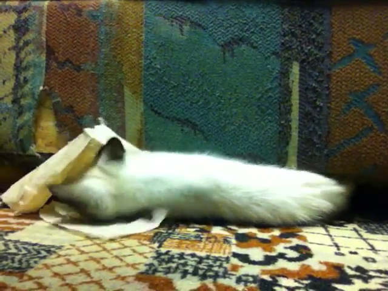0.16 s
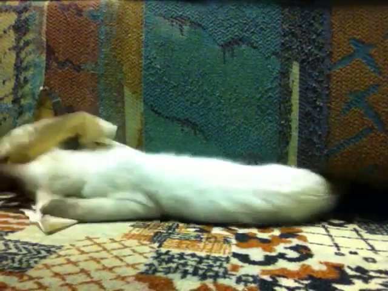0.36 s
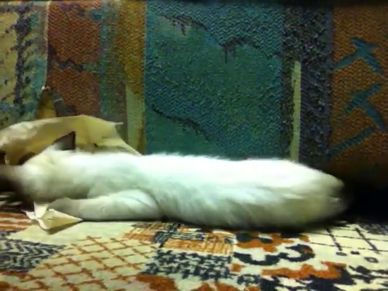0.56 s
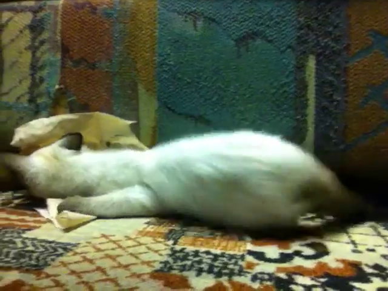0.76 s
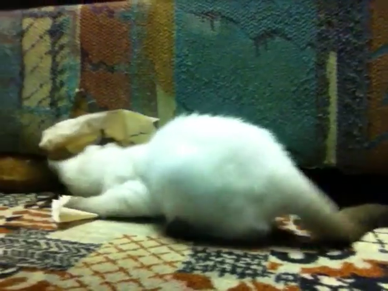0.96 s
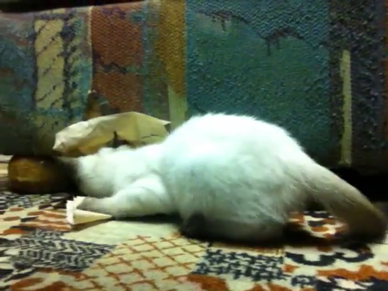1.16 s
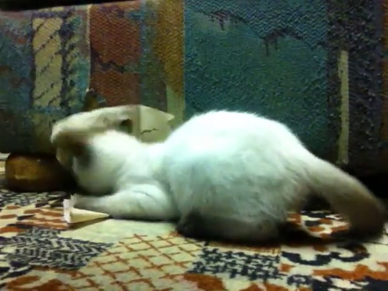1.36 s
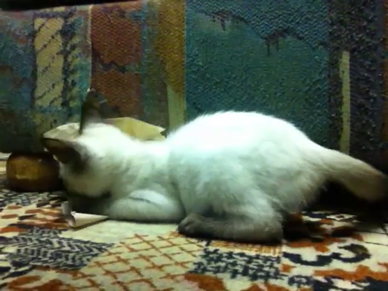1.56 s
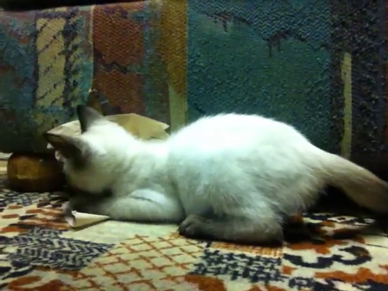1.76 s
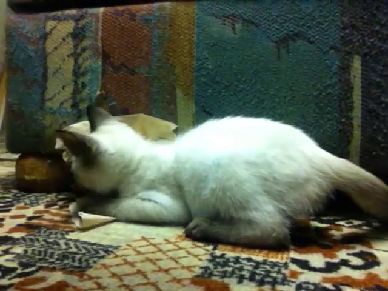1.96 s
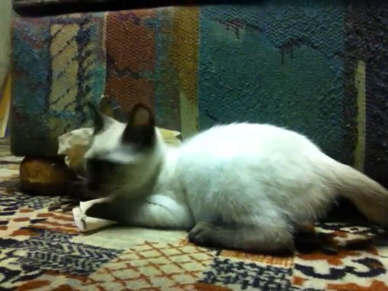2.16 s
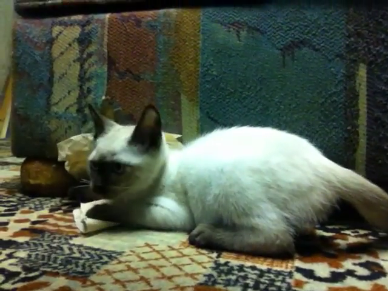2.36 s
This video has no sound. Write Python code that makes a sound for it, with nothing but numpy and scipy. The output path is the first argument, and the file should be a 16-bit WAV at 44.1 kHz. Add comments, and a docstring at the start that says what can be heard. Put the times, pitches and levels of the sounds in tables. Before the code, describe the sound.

Crumpled paper rustles and crackles in short bursts as a kitten paws it on carpet.

```python
"""A kitten paws at crumpled paper on a carpet, over quiet room tone and microphone hiss.
0.1-0.7 s: the hardest tug; fibres slip and rustle, creases snap, panels flap, paws thump the floor.
0.9-1.2 s: fur slides over the pile, with lighter rustling and more soft paw falls.
1.4-1.8 s: claws scratch the sheet in runs of ticks, among weaker snaps and flaps.
2.1-2.3 s: a last snap and a few scratches, then the rustle fades."""
import sys
import numpy as np
from scipy import signal
from scipy.fft import rfft, irfft
from scipy.io import wavfile

SR = 44100
rng = np.random.default_rng(int(sys.argv[2]) if len(sys.argv) > 2 else 0)


def inscribe(sig):
    """Save sig as 16-bit PCM at rate SR to the path in sys.argv[1].

    A 1-D sig is mono; a 2-D sig holds one channel per row.
    Samples are clipped to [-1, 1] before scaling.
    """
    pcm = np.round(np.clip(np.atleast_2d(sig).T, -1, 1) * 32767)
    wavfile.write(sys.argv[1], SR, pcm.astype(np.int16))


N = 105840
TIME = np.arange(N) / SR


def amp(db):
    """Decibels to gain."""
    return 10 ** (np.asarray(db) / 20)


def unit(x):
    """Scale to rms 1."""
    return x / np.sqrt(np.mean(x ** 2) + 1e-20)


def read(points, hz):
    """Interpolate a table on a log-frequency axis."""
    points_hz, value = np.transpose(points)
    return np.interp(np.log(hz + 1), np.log(points_hz + 1), value)


def add(mix, start_s, sound):
    """Mix a sound in at start_s."""
    part = mix[max(round(start_s * SR), 0):][:len(sound)]
    part += sound[:len(part)]


def colour(x, spectrum, size=4096):
    """Causal unit-energy filter with the given spectrum."""
    log_gain = np.log(amp(read(spectrum, abs(np.fft.fftfreq(size, 1 / SR)))))
    taps = np.fft.ifft(np.exp(np.conj(signal.hilbert(log_gain)))).real[:size // 2]
    return signal.fftconvolve(x, taps / np.linalg.norm(taps))[:N]


def grains(per_s, spread_db, clump_db, clump_s=0.0045):
    """Tiny slips of uneven size, in clumps; rms 1."""
    size = amp(spread_db * np.minimum(rng.exponential(1, N), 4)) * rng.choice([-1., 1.], N)
    window = np.hanning(int(2 * clump_s * SR) + 3)
    clumps = unit(signal.fftconvolve(rng.standard_normal(N), window, "same"))
    return unit(size * (rng.random(N) < per_s / SR) * amp(clump_db * clumps))


def swing(t, hz, rise_cycles):
    """Heavily damped oscillation whose envelope peaks after rise_cycles; peak 1."""
    age = t * hz / rise_cycles
    wave = np.sin(2 * np.pi * hz * t) * age * np.exp(-age)
    return wave / abs(wave).max()


def background(hiss_db=-56, whine_db=-85, whine_hz=15280):
    """Room tone, microphone hiss and a thin electronic whine."""
    # Noise floor. Each row: frequency in Hz, relative density in dB.
    spectrum = [(20, -1), (50, -14), (85, 3.5), (190, 1), (330, -3), (470, -9), (690, -11.5), (1000, -18.5),
                (1500, -18.5), (2200, -17.5), (3200, -19.5), (5000, -19), (9000, -20.5), (15500, -23.5)]
    gain = amp(read(spectrum, np.fft.rfftfreq(N, 1 / SR)))
    hiss = unit(irfft(rfft(rng.standard_normal(N)) * gain, N))
    return amp(hiss_db) * hiss + amp(whine_db) * np.sin(2 * np.pi * whine_hz * TIME)


def room(x, predelay_s=0.004, tap_chance=0.07):
    """Short tail of a furnished room: sparse reflections, dying fastest near 5 kHz."""
    # Room decay. Each row: frequency in Hz, T60 in seconds.
    t60_by_hz = [(100, .3), (400, 0.22), (1500, 0.31), (5000, 0.16), (12000, 0.36)]
    n = SR // 2
    taps = rng.choice([-1., 1.], n) * (rng.random(n) < tap_chance) * (TIME[:n] > predelay_s)
    hz, t, bands = signal.stft(taps, SR, nperseg=256)
    decay = amp(-60 * t / read(t60_by_hz, hz)[:, None])
    tail = signal.istft(bands * decay, SR, nperseg=256)[1]
    return signal.fftconvolve(x, tail / np.linalg.norm(tail))[:N]


def slides(sheen_hz=5400, sheen_width_hz=520, sheen_db=8.5):
    """Fur and paws on carpet and paper: fine slips swell with each stroke, with a narrow treble sheen."""
    # Each row: fastest moment in seconds, rise in seconds, fall in seconds, level in dB.
    strokes = [(.125, 0.028, .04, -61), (.345, 0.12, 0.092, -53), (.525, 0.036, .03, -56),
               (0.944, 0.075, 0.08, -52.5), (1.54, 0.2, .1, -69)]
    # Fur on the pile. Each row: frequency in Hz, relative density in dB.
    spectrum = [(200, 4), (1000, 8), (2200, 7), (2900, 5.5), (3800, 0.5), (4700, -0.5), (5900, -8),
                (6500, 0), (7500, -3.5), (10000, -8), (15000, -37)]
    speed = np.zeros(N)
    for peak_s, rise_s, fall_s, db in strokes:
        width_s = np.where(TIME < peak_s, rise_s, fall_s)
        speed += amp(db) * np.exp(-((TIME - peak_s) / width_s) ** 2)
    hiss = colour(grains(per_s=20000, spread_db=3.5, clump_db=0.4) * speed, spectrum)
    sheen = signal.lfilter(*signal.iirpeak(sheen_hz, sheen_hz / sheen_width_hz, SR), hiss)
    return hiss + amp(sheen_db) * sheen


def thumps(floor_hz=93, floor_t60_s=0.18, floor_db=-7.5, highpass_hz=73.4):
    """Each paw gives a padded push and the floor booms briefly."""
    # Each row: start in seconds, level in dB, pitch in Hz.
    paw_falls = [(0.413, -30.5, 178), (0.4774, -30.5, 128), (.496, -39, 94.4), (.597, -40.5, 108),
                 (0.678, -45, 102), (0.914, -43.5, 108), (1.054, -40, 117), (1.066, -36.5, 105),
                 (1.172, -54, 152), (1.58, -46.5, 102)]
    out, t = np.zeros(N), TIME[:SR // 3]
    boom = amp(floor_db - 60 * t / floor_t60_s) * np.sin(2 * np.pi * floor_hz * t)
    for start_s, db, hz in paw_falls:
        add(out, start_s, amp(db) * (swing(t, hz, rise_cycles=0.41) + boom))
    return signal.lfilter(*signal.butter(2, highpass_hz, "high", fs=SR), out)


def scratches(release_s=0.014, lowpass_hz=4900):
    """A claw catches in a quick run of ticks that ring the paper, then lets go."""
    # Each row: start in seconds, hold in seconds, level in dB.
    catches = [(1.45, 0.0046, -69), (1.46, .005, -68), (1.584, 0.0033, -54), (1.6567, 0.015, -52),
               (2.1024, 0.011, -44), (2.17, 0.013, -61), (2.253, .006, -59.5)]
    # Paper under a claw. Each row: frequency in Hz, bandwidth in Hz, relative level in dB.
    resonances = [(360, 50, -2), (1050, 230, -6), (1360, 150, 0), (1623, 130, -5), (1984, 93, -8),
                  (2600, 180, -8.5), (4150, 230, -15)]
    force = sum(amp(db) * (TIME >= start_s) * np.exp(-np.maximum(TIME - start_s - hold_s, 0) / release_s)
                for start_s, hold_s, db in catches)
    t = TIME[:SR // 20]
    body = np.zeros(len(t))
    for k, (hz, width_hz, db) in enumerate(resonances):
        envelope = amp(db) * width_hz * np.exp(-np.pi * width_hz * t)
        body += (-1) ** k * envelope * np.cos(2 * np.pi * hz * t)
    body = signal.lfilter(*signal.butter(2, lowpass_hz, "low", fs=SR), body)
    ticks = grains(per_s=2600, spread_db=-0.8, clump_db=3.5)
    return signal.fftconvolve(ticks * force, body / np.linalg.norm(body))[:N]


def sheet(x, gain_db=-14.5):
    """The sheet's modes ring on after whatever shakes it."""
    # Each row: frequency in Hz, relative level in dB, T60 in seconds.
    modes = [(150, -4, .18), (374, 1, .22), (950, -4, .18), (1078, -4, .18), (1292, -8, .18),
             (1390, -7, .14), (1495, -9, .18), (2010, -12, .12), (2750, -14, .1)]
    t = TIME[:SR // 4]
    ringing = sum(amp(db - 60 * t / t60_s) * np.sin(2 * np.pi * hz * t) for hz, db, t60_s in modes)
    return amp(gain_db) * signal.fftconvolve(x, 2 * ringing / np.sum(ringing ** 2))[:N]


def slack_fold(start_s=0.574, level_db=-34.5, start_hz=400, fall_s=0.042, decay_s=0.021):
    """A taut fold sags in pitch as it slackens."""
    out, t = np.zeros(N), TIME[:SR // 8]
    cycles = np.cumsum(start_hz * np.exp(-t / fall_s)) / SR
    add(out, start_s, amp(level_db) * np.sin(2 * np.pi * cycles) * np.exp(-(t / decay_s) ** 2))
    return out


def flaps():
    """Whole panels of the sheet pop over."""
    # Each row: start in seconds, peak in dB, pitch in Hz.
    pops = [(.144, -43.5, 550), (0.229, -47, 254), (0.2445, -35, 255), (0.2805, -32, 384),
            (0.308, -26, 327), (0.3192, -23.5, 340), (0.3319, -33, 360), (0.343, -32.5, 210),
            (0.3493, -36, 253), (0.482, -33, 288), (.518, -37, 355), (0.537, -38, 330), (.556, -33.5, 580),
            (0.921, -40.5, 252), (1.054, -33.5, 269), (1.437, -44, 345), (1.495, -38.5, 394),
            (1.545, -42, 430), (1.591, -45, 484), (1.606, -45, 396)]
    out, t = np.zeros(N), TIME[:SR // 8]
    for start_s, db, hz in pops:
        add(out, start_s, amp(db) * swing(t, hz, rise_cycles=0.4))
    return out


def snaps(grit_gain=0.18, grit_decay_s=0.0057):
    """Creases flip, each with a sharp swing and a little grit."""
    # Each row: start in seconds, level in dB, pitch in Hz.
    creases = [(.109, -39.5, 2870), (.136, -47, 1070), (.18, -45, 1360), (.221, -32.5, 1170),
               (.228, -40, 1370), (.289, -43, 1200), (.3195, -26, 1065), (.33, -36.5, 3000),
               (.436, -35.5, 1580), (.46, -38, 1230), (.47, -32.5, 1340), (.511, -43, 1300),
               (.545, -32, 1140), (.574, -34.5, 1390), (.581, -43, 1400), (.611, -41, 1440),
               (.668, -39.5, 2100), (.923, -38, 1320), (.932, -44, 1500), (1.094, -44, 1090),
               (1.469, -42, 1170), (1.492, -43, 1280), (1.661, -43, 1910), (1.758, -53, 1660),
               (1.543, -39.5, 3300), (1.587, -42, 2700), (1.593, -41, 1400), (2.1088, -40, 3500),
               (2.112, -56, 1380)]
    out, t = np.zeros(N), TIME[:SR // 20]
    for start_s, db, hz in creases:
        band = signal.butter(2, [hz / 2, hz * 2], "band", fs=SR)
        grit = unit(signal.lfilter(*band, rng.standard_normal(len(t)))) * np.exp(-t / grit_decay_s)
        add(out, start_s, amp(db) * (swing(t, hz, rise_cycles=0.42) + grit_gain * grit))
    return out


def rustle():
    """Fibres and small folds slip, sounding through the sheet."""
    # How hard the paper is worked. Each row: time in seconds, level in dB.
    effort_curve = [(0, -75), (.08, -60.5), (.13, -54.5), (.2, -57), (.265, -43.5), (.315, -39),
                    (.37, -42.5), (.45, -51), (.49, -44), (.55, -44.5), (.6, -55.5), (.64, -57.5),
                    (.78, -57), (.86, -55), (.93, -49.5), (.98, -53), (1.05, -52.5), (1.095, -59.5),
                    (1.12, -64.5), (1.2, -67), (1.39, -68.5), (1.445, -51.5), (1.52, -57.5), (1.575, -51),
                    (1.63, -54), (1.71, -63), (1.76, -64), (1.85, -71), (2.08, -66), (2.19, -55.5),
                    (2.22, -59), (2.4, -72)]
    # Rustling paper. Each row: frequency in Hz, relative density in dB.
    spectrum = [(50, -47), (100, 10.5), (170, 7), (280, 5), (390, 9), (520, 2.5), (750, -5), (1000, 5.5),
                (1400, 0), (2000, -4), (2300, -12), (2850, -5.5), (3700, -15), (6000, -26), (10000, -24.5),
                (16000, -49)]
    effort = amp(np.interp(TIME, *np.transpose(effort_curve)))
    return colour(grains(per_s=5000, spread_db=2.5, clump_db=2.0) * effort, spectrum)


def scene(rubbing_send_db=-13.5, blows_send_db=-11.5):
    """Kitten and paper in the room, the same in both channels."""
    rubbing = rustle() + slides()
    blows = snaps() + flaps() + slack_fold() + scratches()
    direct = rubbing + blows
    reverb = room(amp(rubbing_send_db) * rubbing + amp(blows_send_db) * blows)
    mono = direct + sheet(direct) + thumps() + reverb + background()
    return np.array([mono, mono])


def record(dry, highpass_hz=30, lowpass_hz=15700):
    """Microphone bass roll-off and a steep band limit."""
    thinned = signal.sosfilt(signal.butter(1, highpass_hz, "high", fs=SR, output="sos"), dry)
    taps = signal.firwin(611, lowpass_hz, window=("kaiser", 9), fs=SR)
    return signal.oaconvolve(thinned, taps[None], "same")


dry = scene()
out = record(dry)
inscribe(out)
```